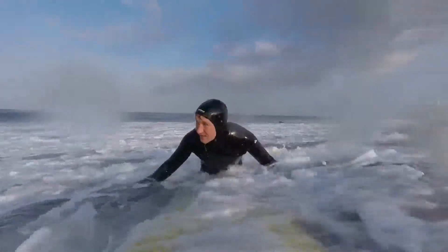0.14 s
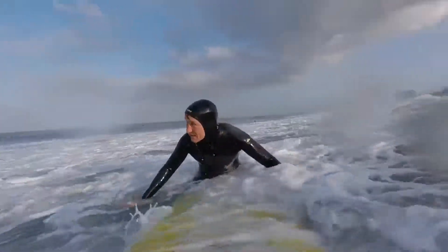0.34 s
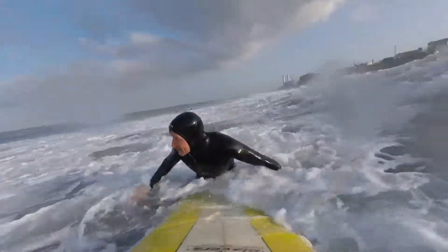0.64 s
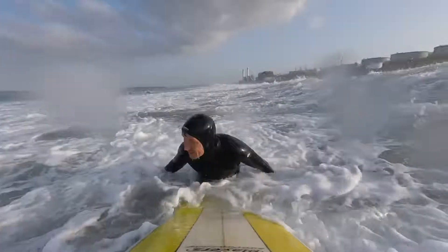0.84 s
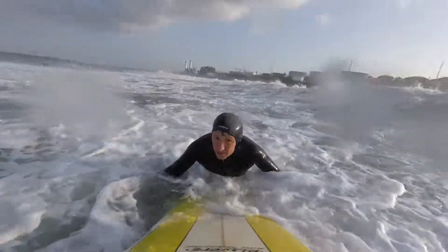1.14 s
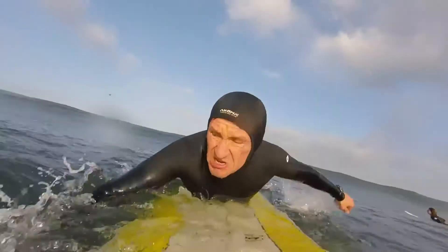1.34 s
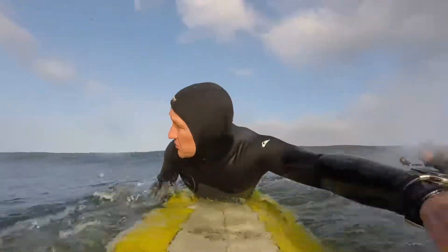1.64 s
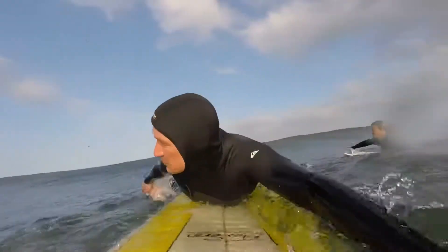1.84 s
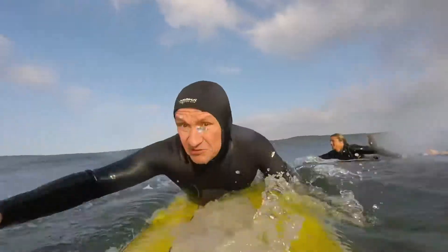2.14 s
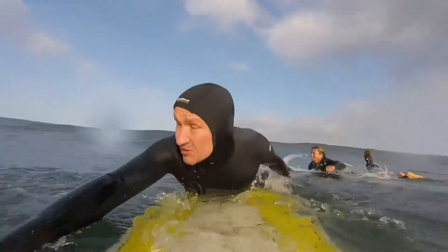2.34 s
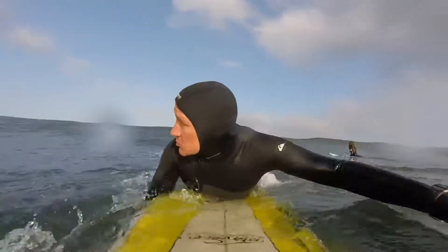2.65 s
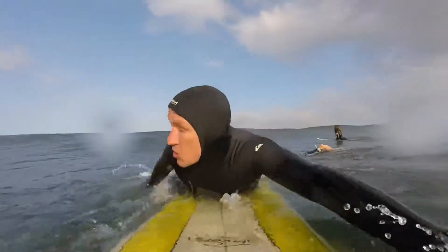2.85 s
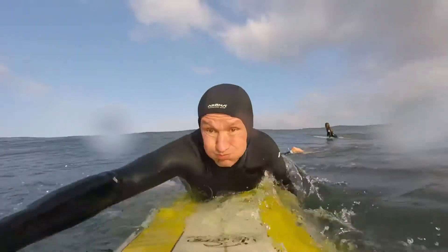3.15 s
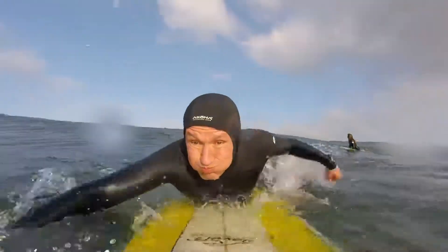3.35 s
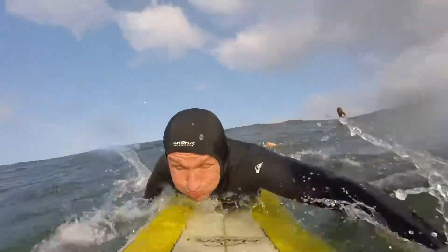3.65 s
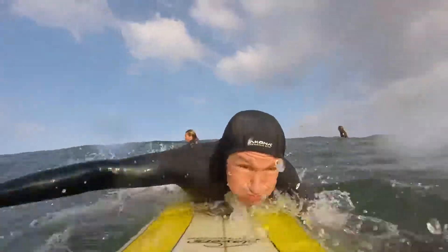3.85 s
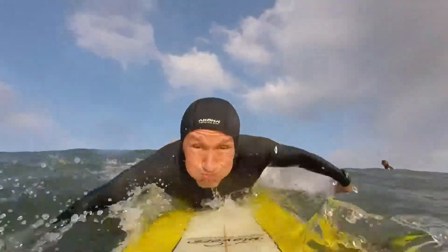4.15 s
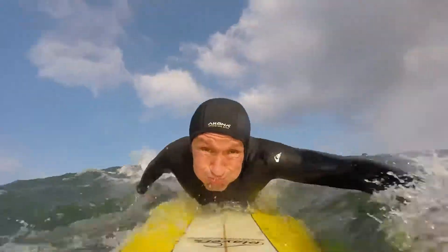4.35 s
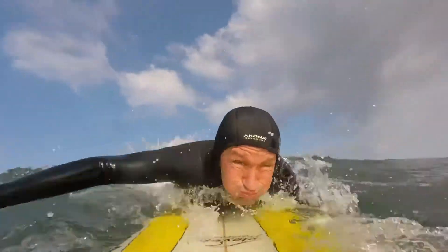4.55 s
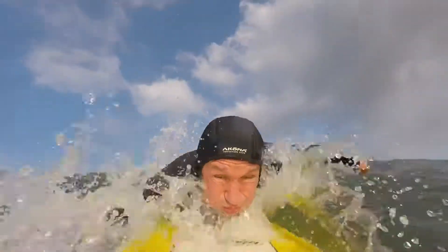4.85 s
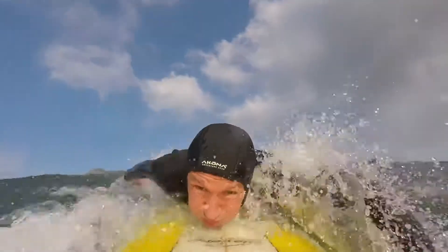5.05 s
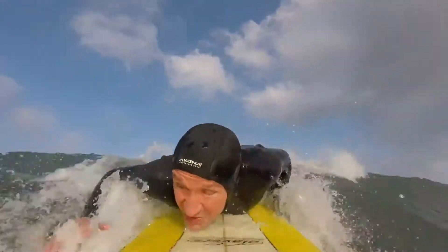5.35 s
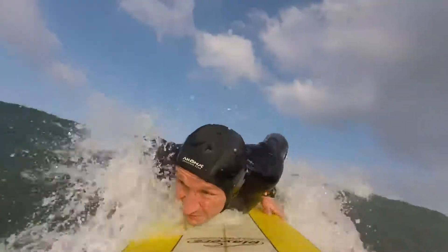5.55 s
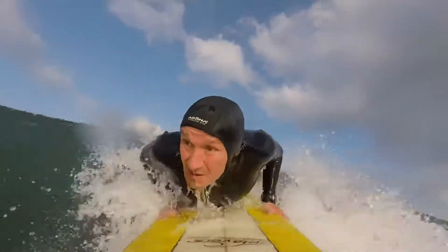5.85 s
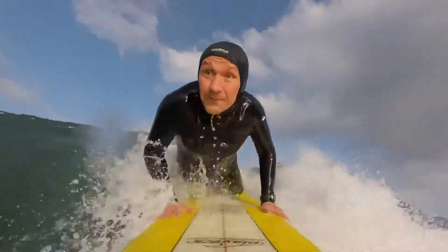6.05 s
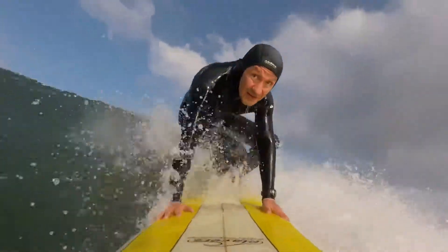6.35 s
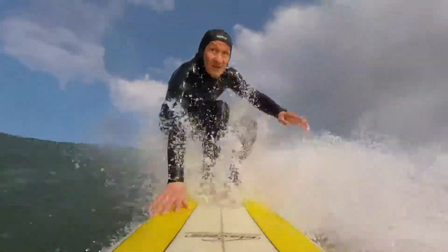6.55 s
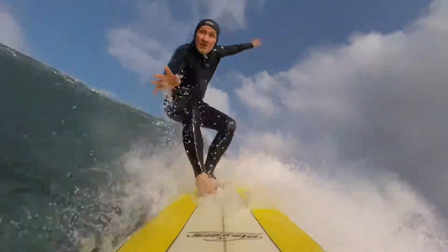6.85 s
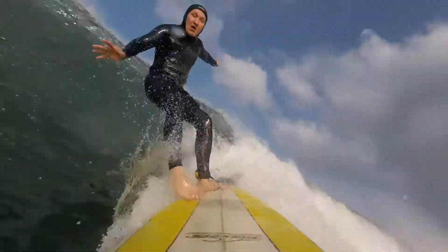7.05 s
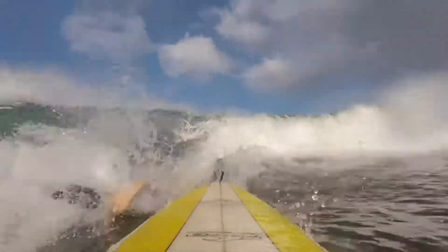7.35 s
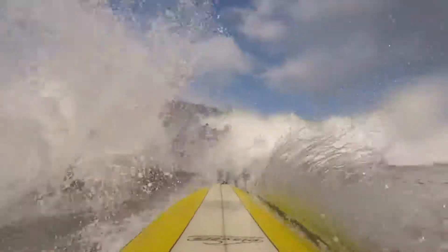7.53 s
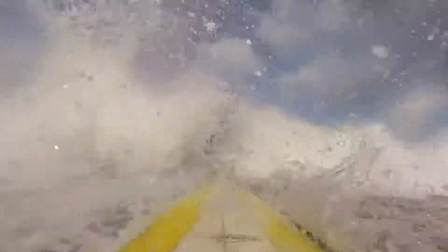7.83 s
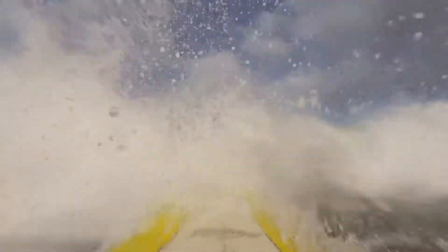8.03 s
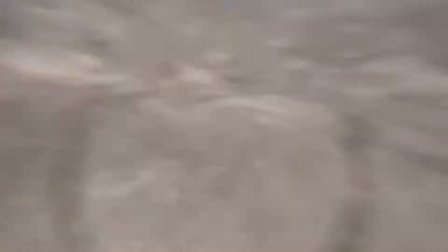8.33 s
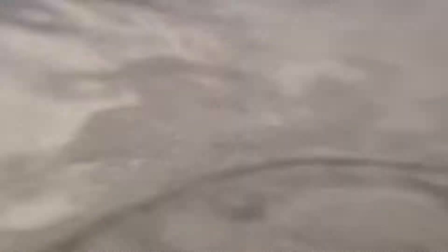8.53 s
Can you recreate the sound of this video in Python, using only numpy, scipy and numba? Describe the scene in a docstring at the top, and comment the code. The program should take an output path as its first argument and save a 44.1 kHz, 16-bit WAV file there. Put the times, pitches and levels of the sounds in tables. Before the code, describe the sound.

Surfer paddling through choppy sea, heard through a sealed housing: throbbing bass rumble, wet splashes, bubbling gulps, board knocks, then a fall into hissing whitewater.

```python
"""At sea, on the nose of a surfboard: a surfer paddles through chop and whitewater, pops up and falls.
A sealed camera hears it. Wind and chop shake the nose into a rumble: an uneven low tone plus low noise.
Water splashes (hiss and short bubble tones, ringing the housing) and knocks and gurgles along the hull.
Drops plink, air pockets gulp and something squeaks as gliding tones; slaps make the board ring, spray
ticks on the housing, a foot rubs the deck in small slips, and near the end the sound cuts out with a click."""
import sys
import numpy as np
from scipy import signal
from scipy.fft import rfft, irfft, next_fast_len
from scipy.io import wavfile
from scipy.ndimage import uniform_filter1d
from numba import njit

SR = 44100
rng = np.random.default_rng(int(sys.argv[2]) if len(sys.argv) > 2 else 0)


def unload_audio(sound):
    """Save the sound as a 16-bit wav file, at the path given as the first command line argument."""
    columns = np.transpose(np.atleast_2d(sound))
    # keep every value between -1 and 1, then stretch to whole-number steps
    steps = np.round(np.clip(columns, -1, 1) * 32767)
    wavfile.write(sys.argv[1], SR, steps.astype(np.int16))


N = 383229
TIME = np.arange(N) / SR  # seconds


def undb(db):
    """Turn decibels into gain."""
    return 10 ** (np.asarray(db) / 20)


def unit(x):
    """Scale a sound to an average (rms) level of 1."""
    return x / np.sqrt(np.mean(x ** 2) + 1e-18)


def curves(rows):
    """Join each column of a table by straight lines in time."""
    s, *columns = np.transpose(rows)
    return [np.interp(TIME, s, column) for column in columns]


def colour(x, points):
    """Filter by a spectrum of (Hz, dB) points that falls away steeply beyond its ends."""
    size = next_fast_len(len(x) + 2048)
    octave = np.log2(np.arange(size // 2 + 1) * SR / size + 1)
    hz, db = np.transpose(points)
    inside = np.clip(octave, np.log2(hz[0]), np.log2(hz[-1]))
    outside_octaves = abs(octave - inside)
    gain = undb(np.interp(octave, np.log2(hz), db) - 21 * outside_octaves)
    return irfft(rfft(x, size) * gain, size)[:len(x)]


def walk(rate):
    """Wander at random, heading for a new value `rate` times a second."""
    knots = rng.standard_normal(4096)
    return 1.38 * np.interp(TIME * rate, np.arange(len(knots)), knots)


def even(x, span_s):
    """Hold a texture at rms 1 over the given span, keeping its faster detail."""
    power = np.abs(uniform_filter1d(x ** 2, max(int(span_s * SR), 8)))
    return x / np.sqrt(power + 1e-12)


def add(out, s, x):
    """Mix a sound in at time s."""
    i = int(np.clip(s * SR, 0, N - 1))
    out[i:i + len(x)] += x[:N - i]


def swell(s, rise_s, fall_s):
    """Gain that climbs to 1 at time s and dies away, 20 dB in each given time."""
    return undb(-20 * np.maximum((s - TIME) / rise_s, (TIME - s) / fall_s).clip(0, 10))


@njit
def ring_grains(out, start, hz, cycles, size, rise):
    """Add sines that swell over about a cycle and creep up in pitch as they die."""
    y = out.copy()
    for k in range(len(start)):
        length = int(cycles[k] * SR / hz[k]) + 2
        # each sample, the tone turns and fades by one step, and that step speeds up a little
        step = np.exp(2j * np.pi * hz[k] / SR - 6 / length)
        glide = np.exp(2j * np.pi * hz[k] / SR * rise / length)
        z, closed, opening = size[k] + 0j, 1., np.exp(-hz[k] / SR)
        for i in range(int(start[k]), min(int(start[k]) + length, len(y))):
            y[i] += z.imag * (1 - closed)
            closed *= opening
            z *= step
            step *= glide
    return y


def bubbles(low_hz, high_hz, cycles, spread_db, count):
    """A cloud of bubbles and droplets of all sizes, mostly faint, a few loud."""
    when, pitch, life, strength = rng.random((count, 4)).T
    hz = low_hz * (high_hz / low_hz) ** pitch
    size = undb(-spread_db * np.log(1 - .982 * strength)) * hz / low_hz
    return ring_grains(np.zeros(N), when * N, hz, cycles * 2 ** (2 * life - 1), size, .12)


# Moments when the water falls briefly quiet.
# Each row: middle in seconds, half length in seconds, depth in dB.
LULL_TIMES = [(6.383, .026, 15), (6.653, .037, 8), (7.56, .036, 11), (7.715, .025, 5), (8.157, .04, 6.5)]


def lull_db():
    """How far the water has fallen quiet at each moment, in dB."""
    dips = 0
    for s, half_s, depth_db in LULL_TIMES:
        dips = dips - depth_db * np.exp(-np.minimum(((TIME - s) / half_s) ** 2, 50))
    return dips


# The steady wash of foam around the board, before lulls and clumps change it.
# Each row: time in seconds, then levels in dB of splash, housing ring and fine spray.
FOAM_WASH = [(0, -37, -45, -51), (0.67, -46.5, -52, -59), (1.11, -44.5, -50.5, -59), (1.6, -50, -52.5, -66),
             (2.76, -45.5, -48, -64.5), (3.3, -43.5, -52.0, -57), (3.85, -46.5, -48.0, -63),
             (4.85, -49, -47.5, -60), (5.36, -43.5, -38, -59.5), (6.09, -43.0, -38.5, -62.0),
             (6.59, -49.5, -51.0, -65.5), (7.05, -52.5, -48.5, -66.0), (7.7, -49, -51, -62),
             (8.32, -44, -45, -47), (8.6, -42, -46, -50), (8.69, -49, -56, -78)]
# Arm strokes, breaking crests and the final fall, each added to the wash.
# Each row: peak in seconds, seconds to swell by 20 dB, seconds to fall by 20 dB,
# then levels in dB of splash, housing ring and fine spray.
SPLASH_BURSTS = [(0.975, 0.1, 0.1, -37, -58, -64), (1.178, 0.14, 0.06, -41, -46, -51),
                 (1.85, 0.03, 0.14, -40.5, -39, -54), (2.109, 0.14, 0.14, -34.5, -35.0, -53),
                 (2.225, 0.06, 0.18, -40, -37.5, -57), (2.334, 0.1, 0.15, -38.5, -42.0, -60),
                 (2.476, 0.08, 0.06, -37.5, -42, -54), (2.893, 0.12, 0.23, -40.5, -47.5, -55),
                 (3.215, 0.15, 0.14, -32, -32, -57), (3.376, 0.13, 0.14, -27, -25.5, -42.5),
                 (3.636, 0.15, 0.15, -32.0, -33.5, -51), (3.968, 0.13, 0.07, -34.5, -45.0, -61),
                 (4.075, 0.06, 0.14, -35.0, -35.0, -51), (4.336, 0.14, 0.06, -27, -27, -42.5),
                 (4.402, 0.015, 0.15, -27.5, -27.5, -50), (4.6, 0.14, 0.14, -37, -40.5, -57),
                 (4.768, 0.08, 0.14, -32.5, -34.5, -51), (5.026, 0.02, 0.18, -32.5, -38.5, -54.0),
                 (5.387, 0.11, 0.33, -36, -39, -62.5), (6.087, 0.24, 0.03, -38.5, -29.5, -57.0),
                 (6.83, 0.12, 0.06, -32.5, -48, -66), (6.92, 0.05, 0.03, -39, -40, -56),
                 (7.36, 0.45, 0.25, -41, -43, -58), (7.468, 0.05, 0.015, -30, -40, -51),
                 (7.739, 0.008, 0.22, -35.5, -38.5, -52), (7.976, 0.14, 0.09, -34.0, -35.0, -50.0),
                 (8.064, 0.13, 0.03, -33.5, -37, -44), (8.205, 0.008, 0.12, -30, -34, -31),
                 (8.34, 0.14, 0.22, -40, -38.5, -42.5)]
ENGULFED_S = 7.9  # splashes after this break over the housing itself


def flow():
    """Levels in dB of splash, housing ring, close spray and thrown spray: powers simply add up."""
    splash, ring, close = undb(curves(FOAM_WASH)) ** 2
    thrown = np.full(N, 1e-12)
    for s, rise_s, fall_s, splash_db, ring_db, spray_db in SPLASH_BURSTS:
        burst = swell(s, rise_s, fall_s) ** 2
        splash += undb(splash_db) ** 2 * burst
        ring += undb(ring_db) ** 2 * burst
        spray = close if s > ENGULFED_S else thrown
        spray += undb(spray_db) ** 2 * burst
    return 10 * np.log10([splash, ring, close, thrown]) + lull_db()


def spatter(spread_db, fade_s, count):
    """Gain of water landing in gobs: each swells and fades within milliseconds; rms 1."""
    when, strength = rng.random((count, 2)).T
    gob_power = undb(-spread_db * np.log(1 - .97 * strength)) ** 2
    power = np.bincount((when * N).astype(int), gob_power, N)
    t = TIME[:SR // 20]
    pulse = t / fade_s * np.exp(-t / fade_s)
    return even(np.sqrt(abs(signal.fftconvolve(power, pulse)[:N])), .1)


# How broken up the water is.
# Each row: time in seconds, share from 0 to 1 that is separate drops rather than foam.
DROP_SHARE = [(0, 0.06), (1.1, 0.36), (1.3, 0.58), (4.4, 0.54), (5.3, .2), (7.4, 0.3), (8.3, 0.5)]
# The tone colours of splash, ringing housing, fine spray, its bright fizz, and the duller spray
# flung up by a stroke. Each row: pitch in Hz, relative level in dB.
SPLASH_COLOUR = [(400, -6.5), (650, -4.5), (900, -3), (1100, -3.5), (1280, 0.5), (1550, -2), (1800, -0.5),
                 (2200, -7), (2700, -11.5), (3400, -13.5), (3900, -22)]
HOUSING_COLOUR = [(1900, -39.5), (2350, -4.5), (2650, 2.5), (2920, 3), (3250, -1.5), (3550, -10),
                  (3900, -38), (5000, -48)]
SPRAY_COLOUR = [(3000, -17), (3800, -3.5), (4350, 1.5), (4900, -5.5), (5800, -9.5), (7300, -15),
                (8500, -19.5), (11000, -26.5), (14000, -42.5)]
FIZZ_COLOUR = [(5000, -8.5), (7400, 5), (9000, -6), (12000, -14), (14000, -7), (15500, -28)]
THROWN_COLOUR = [(3000, -4), (4300, 1), (5000, -5), (5800, -10), (6800, -26)]
MIST_SHARE = .8  # fine spray is smoother: its share of separate drops, relative to the splash


def water():
    """Foam hiss and bursting drops pass the housing wall, which rings near 3 kHz; spray sits on top."""
    splash_db, ring_db, spray_db, thrown_db = flow()
    share, = curves(DROP_SHARE)
    fine = share * MIST_SHARE
    # short spatter, and a few whole bubbles that ring on as plops
    gobs = bubbles(600, 4200, cycles=15, spread_db=3.9, count=7500)
    gobs = gobs + bubbles(480, 3300, cycles=45, spread_db=3.8, count=800)
    mist = bubbles(3600, 14000, cycles=7, spread_db=5.3, count=7000)
    # water arrives in clumps, which lift all pitches together
    clumps = np.sqrt(1 - share + share * spatter(spread_db=3.9, fade_s=.0021, count=1300) ** 2)
    # the louder the spray, the brighter it is
    fizz_db = 1.4 * spray_db - 6.5
    layers = ((gobs, share, SPLASH_COLOUR, splash_db),
              (gobs, share, HOUSING_COLOUR, ring_db),
              (mist, fine, SPRAY_COLOUR, spray_db),
              (mist, fine, FIZZ_COLOUR, fizz_db),
              (mist, fine, THROWN_COLOUR, thrown_db))
    out = 0
    for grains, part, shape, db in layers:
        foam = unit(colour(rng.standard_normal(N), shape))
        separate = even(colour(grains, shape), 0.1)
        out = out + undb(db) * (np.sqrt(1 - part) * foam + np.sqrt(part) * separate)
    return out * clumps


# How hard wind and chop shake the nose. Each row: time in seconds, relative level in dB.
CHOP_LEVEL = [(0.0, -14.5), (0.52, -19), (0.58, -8.0), (0.87, -16.5), (1.745, -20), (1.76, -9), (1.87, -19),
              (2.04, -21), (2.06, -12), (2.41, -9.5), (2.75, -16.5), (3.15, -22.0), (3.2, -10.5),
              (6.3, -11.5), (6.49, -14.5), (7.4, -12), (7.6, -15), (8.69, -12.5)]
# How fast the nose swings, on average. Each row: time in seconds, swings per second in Hz.
SWING_RATE = [(0, 45), (1.6, 41), (2.1, 58), (3.5, 39), (4.05, 46), (5.2, 50), (5.9, 38), (7.45, 53),
              (8.3, 38)]
# The tone colour of the buffeting. Each row: pitch in Hz, relative level in dB.
RUMBLE_COLOUR = [(17, -11), (24, 1.5), (36, 3), (52, -4.5), (64, -3.5), (80, -8), (100, -22), (140, -36.5)]
LULL_ON_SWING = .6  # share of a lull's depth that the swinging feels


def board():
    """Wind and chop swing the nose near 45 Hz, never quite evenly, inside a broader buffeting."""
    db = curves(CHOP_LEVEL)[0] + LULL_ON_SWING * lull_db()
    hz, = curves(SWING_RATE)
    wobbly_hz = hz * (1 + 0.08 * walk(36))
    swing = np.sin(2 * np.pi * np.cumsum(wobbly_hz) / SR) * undb(3.2 * walk(14))
    buffet = even(colour(rng.standard_normal(N), RUMBLE_COLOUR), .25)
    return even(unit(swing) + undb(-3.5) * buffet, .3) * undb(db + .4)


# Water heaving under the hull, before lulls and random wandering change it;
# the row at 6.278 is the low body of the foot rub.
# Each row: peak in seconds, length in seconds, knocking level in dB, gurgling level in dB.
HULL_SURGES = [(0.16, 0.2, -29, -32), (0.575, 0.14, -26, -28), (0.985, 0.2, -30, -27),
               (2.102, 0.38, -25, -31.5), (2.34, 0.5, -23.5, -31.5), (2.78, 0.45, -38, -33.5),
               (3.22, 0.29, -23.5, -34), (3.5, 0.8, -31, -31.5), (4.43, 0.45, -42, -31.5),
               (4.768, 0.4, -26, -32.0), (5.05, 0.2, -28, -32), (5.5, 0.8, -29.5, -30),
               (6.039, 0.46, -28, -36), (6.278, 0.27, -18.0, -28.5), (6.84, 0.22, -29, -27),
               (7.33, 0.5, -35, -35), (7.87, 0.46, -36, -30.5), (8.12, 0.8, -21.5, -37)]
SURGE_SWELL = .4  # share of a surge's length spent building up
KNOCK_UNDER_CHOP_DB, GURGLE_REST_DB = -26.5, -42  # at rest, knocking follows the chop, gurgling is even
LULL_ON_KNOCK = .5  # share of a lull's depth that the knocking feels


def heave():
    """Levels in dB of knocking and gurgling: each table row adds its power to the resting motion."""
    chop_db, = curves(CHOP_LEVEL)
    power = undb([chop_db + KNOCK_UNDER_CHOP_DB, np.full(N, GURGLE_REST_DB)]) ** 2
    for s, length_s, *levels_db in HULL_SURGES:
        surge = swell(s, SURGE_SWELL * length_s, (1 - SURGE_SWELL) * length_s)
        power += undb(levels_db)[:, None] ** 2 * surge ** 2
    return 10 * np.log10(power) + np.outer([LULL_ON_KNOCK, 1], lull_db())


# The tone colours of knocking and gurgling. Each row: pitch in Hz, relative level in dB.
KNOCK_COLOUR = [(90, 2), (120, 0), (138, -6.5), (165, -8.5), (215, -13)]
GURGLE_COLOUR = [(170, -10), (215, -3.5), (260, -3), (315, -3), (370, 3), (425, 2), (490, -6), (640, -16.5),
                 (900, -35.5)]


def hull():
    """Chop knocks on the hollow board while large bubbles gurgle; one surge is the foot rub's low body."""
    churn = bubbles(88.8, 722, cycles=8.1, spread_db=2.5, count=2600)
    out = 0
    for shape, db in zip((KNOCK_COLOUR, GURGLE_COLOUR), heave()):
        bubbling = unit(colour(churn, shape))
        rush = unit(colour(rng.standard_normal(N), shape))
        out = out + even(bubbling + .5 * rush, .11) * undb(db)
    return out * undb(1.4 * walk(22))


def plink(hz, ring_s, crack_s, crack_db):
    """One impact with peak 1: a brief crack and a damped tone, swelling over one cycle."""
    t = TIME[:SR // 20]
    tone = np.sin(2 * np.pi * hz * t) * np.exp(-t / ring_s)
    crack = undb(crack_db) * rng.standard_normal(len(t)) * np.exp(-t / crack_s)
    x = (tone + crack) * (1 - np.exp(-t * hz))
    return x / abs(x).max()


# Drops and small splashes landing close by, before the final filter.
# Each row: start in seconds, relative level in dB, pitch in Hz.
LANDING_DROPS = [(0.372, -24, 3200), (0.858, -18, 1400), (1.382, -23.5, 2560), (1.545, -25.5, 2000),
                 (1.82, -24, 2880), (1.836, -22, 2823), (1.909, -27, 2970), (2.115, -18, 3100),
                 (2.329, -18, 950), (2.456, -19.5, 2547), (2.474, -17.0, 2260), (2.572, -22, 2460),
                 (2.618, -26, 2134), (2.661, -21, 3030), (2.714, -24.5, 2680), (3.265, -14, 2230),
                 (3.378, -8.5, 2920), (3.42, -13.5, 2447), (3.486, -18.5, 2190.0), (3.684, -15, 2560),
                 (3.733, -15.5, 2690), (4.371, -12.5, 1450), (4.398, -15.5, 1700), (4.511, -18, 2760),
                 (7.517, -26, 2900), (7.766, -21, 2300), (8.209, -17, 1954)]


def drops():
    """Each gob of water lands with a plink, throws off a few smaller ones and a sizzle of spray."""
    out, t = np.zeros(N), TIME[:SR // 20]
    for s, db, hz in LANDING_DROPS:
        add(out, s, undb(db - .5) * plink(hz, ring_s=.002, crack_s=.0045, crack_db=-8))
        sizzle = unit(colour(rng.standard_normal(len(t)), [(4200, 6), (5300, -7), (6200, -6)]))
        add(out, s, undb(0.83 * db - 20) * sizzle * np.exp(-t / 0.008))
        # three smaller plinks within 7 ms
        for lag, detune in rng.random((3, 2)):
            small_hz = hz * 2 ** (1.3 * detune - .9)
            small = plink(small_hz, ring_s=.0018, crack_s=.004, crack_db=-9)
            add(out, s + .007 * lag, undb(db - 11) * small)
    return colour(out, [(600, -6.5), (1200, 4), (3200, 5.5), (3800, -6.5),
                        (5500, -8.5), (8000, -38.5), (15000, -37)])


# Air pockets ringing, and at 1.858 a short squeak, perhaps of wetsuit on the board.
# Each row: start in seconds, peak level in dB, starting pitch in Hz, swell in seconds,
# seconds for the ring to fade by 60 dB, pitch rise in octaves per second (negative falls).
GULPS_AND_SQUEAK = [(.526, -27, 418, 0.0049, 0.15, -1.5), (0.561, -23, 411, .005, 0.12, 1.5),
                    (1.128, -18, 345, 0.0042, 0.057, 4), (1.25, -33, 420, .03, .25, 1.2),
                    (1.274, -28, 3230, 0.0016, 0.035, 2.5), (1.858, -19.5, 358, .008, 0.12, 2.5),
                    (2.06, -21, 104, .01, .5, -.6), (2.114, -18.5, 4476, 0.0008, .02, 3),
                    (2.691, -23, 1242, 0.0028, 0.066, 4), (3.516, -9, 409.6, 0.0045, 0.1, 2.5),
                    (4.397, -17, 880, .002, .035, 4), (5.03, -24, 410, .016, .16, -1.5),
                    (6.432, -22.5, 337.3, 0.016, 0.16, 3), (8.632, -30, 1379, 0.006, 0.082, 0)]


def gulps_and_squeak():
    """Trapped air, and one squeak, ring as fading tones that mostly glide up and sometimes down."""
    out, t = np.zeros(N), TIME[:SR // 4]
    for s, db, hz, swell_s, t60, rise in GULPS_AND_SQUEAK:
        shape = (1 - np.exp(-(t / swell_s) ** 2)) * undb(-60 * t / t60)
        tone = np.sin(2 * np.pi * np.cumsum(hz * 2 ** (rise * t)) / SR)
        add(out, s, undb(db) * shape / shape.max() * tone)
    return out


# The ways the board and its mount ring.
# Each row: pitch in Hz, seconds to fade by 60 dB, relative level in dB.
BOARD_MODES = [(48, 0.067, -12.5), (85.5, 0.12, -0.5), (145, 0.061, 1.5), (268, 0.092, -1),
               (360, 0.021, 6.5)]


def board_ring():
    """The board's answer to one short push: a few fading tones."""
    t = TIME[:SR // 3]
    return sum(undb(db) * np.sin(2 * np.pi * hz * t) * undb(-60 * t / t60) for hz, t60, db in BOARD_MODES)


# Waves and limbs slapping the board; the last row is a click as the sound cuts out.
# Each row: start in seconds, relative level of the thud in dB, relative level of the short noise in dB,
# pitch of the push in Hz.
SLAPS_AND_CLICK = [(0.556, -10, -37, 120), (0.571, -10, -40, 250), (1.204, -23, -39, 240),
                   (1.749, -6, -43, 108), (2.056, -13, -37, 90), (2.316, -11, -33, 227),
                   (3.754, -4.5, -47, 115), (3.917, -23, -31, 380), (4.795, -13.5, -36, 117.2),
                   (5.365, -16, -29, 130), (5.662, -15, -30, 200), (6.326, -9, -46, 110.3),
                   (6.557, -12, -34, 128), (6.82, -19, -35, 380), (6.838, -9.5, -30, 241),
                   (6.855, -13, -38, 150), (6.912, -10, -31, 85), (7.204, -19, -31, 350),
                   (7.305, -22, -33, 330), (7.465, -5.5, -28, 125), (7.74, -18, -37, 200),
                   (8.067, -10.5, -35, 110), (8.611, -10.5, -24, 130)]
HOLLOW_DB, HOLLOW_FADE_S = -14.5, .011  # hollow clatter: level relative to the table's thud, fade time


def slaps_and_click():
    """A push rings the board, with hollow clatter and a wet smack; the last one is part of a click."""
    out, t = np.zeros(N), TIME[:SR // 3]
    for s, db, smack_db, hz in SLAPS_AND_CLICK:
        # the push gives way and springs back; a lower pitch makes a longer push
        push = np.sin(2 * np.pi * hz * t) * np.exp(-1.5 * hz * t)
        thud = signal.fftconvolve(board_ring(), push)[:len(t)]
        thud = thud / abs(thud).max() * undb(db + 3.0)
        hollow = unit(colour(rng.standard_normal(len(t)), KNOCK_COLOUR + GURGLE_COLOUR[2:]))
        smack = unit(colour(rng.standard_normal(len(t)), SPLASH_COLOUR))
        wet = undb(db + HOLLOW_DB) * hollow * np.exp(-t / HOLLOW_FADE_S)
        wet = wet + undb(smack_db + 4.5) * smack * np.exp(-t / 0.0075)
        add(out, s, thud + wet * (1 - np.exp(-t / 0.0023)))
    return out


# Spray striking the housing; the last row is a click as the sound cuts out.
# Each row: start in seconds, ring level in dB, pitch in Hz, relative crack level in dB.
TICKS_AND_CLICK = [(3.7659, -18, 2800, -43.5), (5.9043, -28, 2940, -46), (6.3434, -22.5, 2640, -45),
                   (6.5597, -21, 2830, -37), (7.9148, -21, 2891, -37), (7.9921, -4, 2810, -34.5),
                   (8.0286, -28, 3100, -40), (8.0576, -26, 2940, -40), (8.2255, -28, 3000, -37),
                   (8.289, -26, 2900, -39), (8.4865, -32, 3170, -36), (8.6146, -32, 2900, -33.5)]


def ticks_and_click():
    """Spray rings the housing for an instant, brighter for a harder crack; the last is part of a click."""
    out, t = np.zeros(N), TIME[:SR // 20]
    for s, db, hz, crack_db in TICKS_AND_CLICK:
        top_db = min(1.83 * crack_db + 46.5, -5)
        crack_colour = [(3500, 5), (5000, 10.5), (7500, -1.5), (15000, top_db)]
        crack = unit(colour(rng.standard_normal(len(t)), crack_colour)) * np.exp(-t / 0.0025)
        ring = plink(hz, ring_s=0.00089, crack_s=0.0012, crack_db=-44)
        add(out, s + 0.00081, undb(db) * ring + undb(crack_db + 9) * crack)
    return out


# A foot rubbing over the deck.
# Each row: time in seconds, average slips per second in Hz, relative level in dB.
FOOT_RUB = [(6.18, 157.1, -70), (6.215, 150.4, -17), (6.25, 141.5, -14.5), (6.278, 123.6, -15.5),
            (6.315, 118, -69)]


def foot():
    """A wet foot sticks and slips on the deck; each slip rings the board."""
    hz, db = curves(FOOT_RUB)
    wobbly_hz = hz * (1 + 0.01503 * walk(120))
    # one click each time a whole slip has been counted
    slips = np.diff(np.floor(np.cumsum(wobbly_hz) / SR), prepend=0)
    body = signal.fftconvolve(slips * undb(1.3 * walk(110)), board_ring())[:N]
    body = colour(body, [(90, -12), (140, 5.5), (430, -2), (700, -17), (1300, 8.5), (2000, -3)])
    rubbing = (TIME > FOOT_RUB[0][0]) * (TIME < FOOT_RUB[-1][0])
    return even(body, 0.013) * undb(db + 1.5) * rubbing


def scene():
    """Add up all that the one microphone hears, mostly through the board and the housing."""
    mix = water() + board() + hull() + drops()
    mix = mix + gulps_and_squeak() + slaps_and_click() + ticks_and_click() + foot()
    return mix[None]


# Moments when the sound drops out. Each row: start in seconds, end in seconds.
DROPOUTS = [(1.193, 1.203), (8.619, 8.628)]
TOP_HZ = 15800  # the treble is cut above this


def record(dry):
    """The sound drops out twice for an instant; the camera rounds the highest peaks and cuts the top."""
    live = np.ones(N)
    for start, end in DROPOUTS:
        live[(TIME > start) & (TIME < end)] = 0
    x = dry * uniform_filter1d(live, size=90)  # soften the edges over 2 ms
    x = x / (1 + x ** 8) ** (1 / 8)
    return signal.sosfilt(signal.ellip(8, .2, 80, TOP_HZ, fs=SR, output="sos"), x)


dry = scene()
out = record(dry)
unload_audio(out)
```